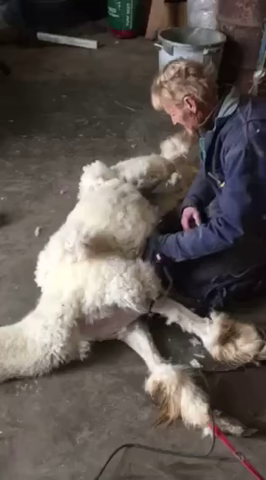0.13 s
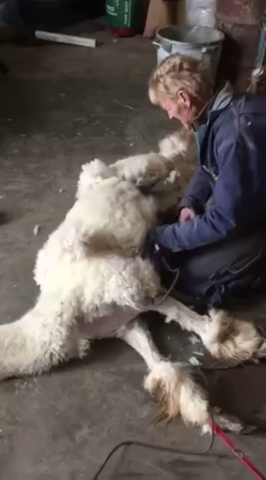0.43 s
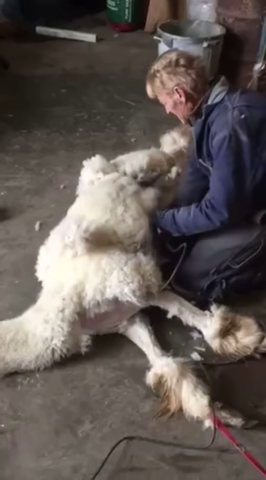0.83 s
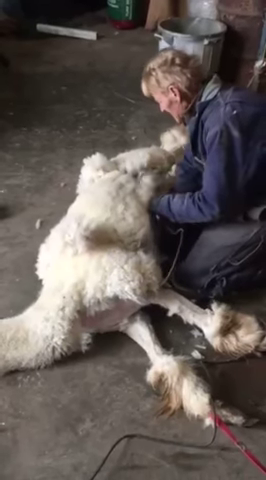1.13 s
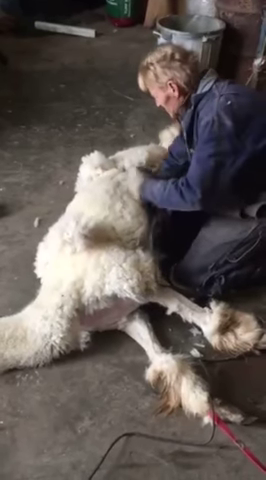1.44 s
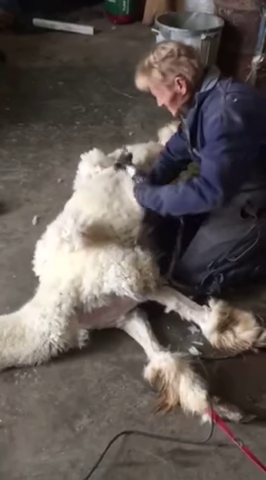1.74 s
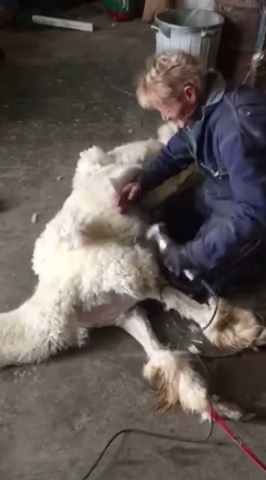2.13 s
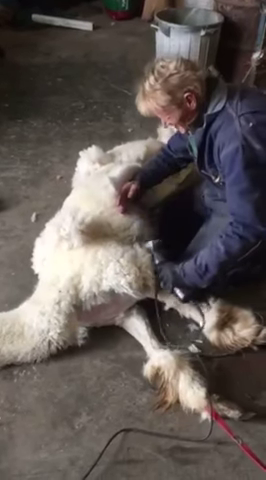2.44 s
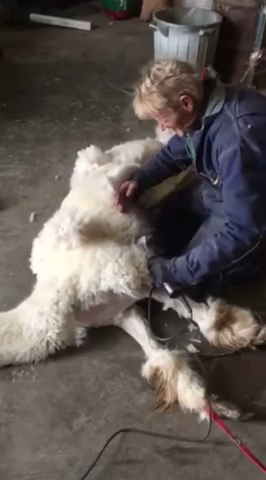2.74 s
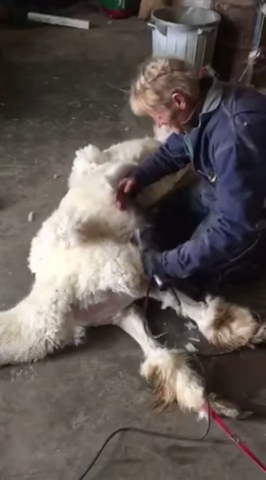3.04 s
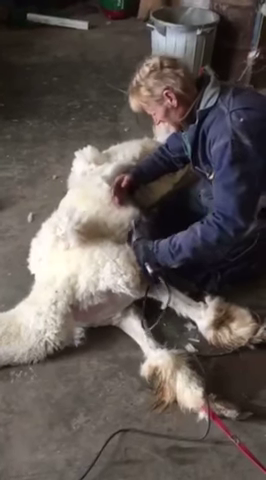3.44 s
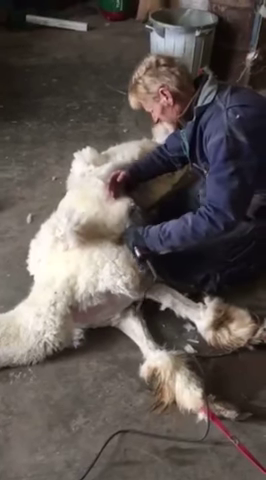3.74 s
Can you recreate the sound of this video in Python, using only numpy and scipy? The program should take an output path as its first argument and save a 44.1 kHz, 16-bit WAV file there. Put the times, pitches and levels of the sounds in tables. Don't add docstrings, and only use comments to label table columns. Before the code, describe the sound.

A continuous harsh buzz of motor clippers shearing fleece, starting abruptly; midway the tool lifts and turns thinner and hissier, then settles back to a stronger rattle. Indoor shed reflections, grainy phone sound.

```python
import sys
import numpy as np
from scipy import signal
from scipy.fft import rfft, irfft, dct
from scipy.io import wavfile
from scipy.ndimage import uniform_filter1d, map_coordinates

SR = 44100
rng = np.random.default_rng(int(sys.argv[2]) if len(sys.argv) > 2 else 0)


def decibels_to_gain(level_db):
    exponent = np.asarray(level_db, float) / 20
    return 10 ** exponent


def to_wav(sig):
    pcm = np.clip(np.atleast_2d(sig), -1, 1) * 32767
    pcm = np.round(pcm).astype(np.int16)
    wavfile.write(sys.argv[1], SR, pcm.T)


N = 171549

# time in seconds, whine in Hz (bars times turns per second).
WHINE_SPEED = [(.15, 7262), (.5, 7222), (.8, 7226), (1.1, 7256), (1.4, 7314), (1.7, 7359), (2, 7391),
               (2.3, 7406), (2.6, 7424), (2.9, 7432), (3.2, 7429), (3.5, 7417), (3.89, 7372)]
# time in seconds, blade level in dB, whine level in dB,
# extra treble from the open side of the head in dB.
HAND = [(.14, -33.5, -41.5, 7), (.26, -28.5, -38.5, -1.5), (.5, -29, -51, -1.5), (.7, -28.5, -42, -0.5),
        (1, -30.5, -58.5, -1.5), (1.28, -30.5, -38, 1), (1.4, -32, -50, 0), (1.68, -31.5, -45, 2.5),
        (1.8, -30.5, -40, 4), (1.95, -26.5, -35, 2), (2.1, -32, -40.5, 7.5), (2.36, -31.5, -42, 9),
        (2.5, -29.5, -43.5, 6.5), (2.66, -31.5, -38.5, 7), (2.71, -29, -41, 0), (3.2, -27.5, -40, -1),
        (3.6, -27.5, -41.5, -1.5), (3.88, -29, -52, -0.5)]
# time in seconds, pressed on the body (0-1), held high (0-1).
POSE = [
    (.14, 0.7, 0),
    (.7, 0.95, 0),
    (1.05, 0.5, 0.5),
    (1.3, 0, 0.5),
    (1.55, 0.01, 1),
    (2.1, 0.02, 1),
    (2.45, 0, .2),
    (3.88, 0.07, 0.5),
]
# multiple of crank speed, level in dB, gain when pressed in dB, gain when high in dB.
CRANK_TONES = [(1, -77, 9, 4), (2, -81, 16, 0), (3, -80, 18, 0), (4, -82, 8, 6), (5, -77, 15, 6),
               (6, -65, 6, -3), (7, -67, 10, -1), (8, -67, 6, 2), (9, -71, 2, 4), (10, -70, 0, 11),
               (11, -70, 6, 5), (12, -66, -4, 8), (14, -63, 0, -1), (16, -59, -3, -4)]
# multiple of motor speed, level in dB, gain when pressed in dB, gain when high in dB.
MOTOR_TONES = [(1, -54, -5, -10), (2, -49, -7, -4), (9, -57, 0, 0), (12, -63, 6, 0)]
# frequency in Hz, level in dB.
BLADE_COLOUR = [(250, -34.5), (620, -9), (1200, -1.5), (2000, -5), (3000, -3), (4300, -3.5), (4900, -7),
                (5800, -8)]
# frequency in Hz, level in dB.
RUMBLE_COLOUR = [(15, -29), (25, -12.5), (81, -13), (189, -12), (392, 0), (600, -8), (780, -36.5),
                 (1320, -120)]
# time in seconds, lag in ms, level in dB.
ECHO = [
    (.14, 0.71, -11.5),
    (1.62, 0.9, -15),
    (1.78, 0.82, -3.5),
    (2, 0.9, -5.5),
    (2.15, .78, -6),
    (2.38, 0.6, -6.5),
    (2.45, 0.78, -9.5),
    (2.7, 0.77, -9),
    (3.88, .74, -7.5),
]
# time in seconds, lag in ms, level in dB.
GLOVE = [
    (.14, .37, -9),
    (.7, 0.37, -11),
    (1.5, 0.37, -16),
    (1.95, 0.29, -10),
    (2.15, 0.35, -12.5),
    (2.35, 0.3, -6.5),
    (2.62, 0.29, -5.5),
    (2.75, 0.31, -12.5),
    (3.2, 0.29, -12),
    (3.88, 0.28, -15.5),
]
# frequency in Hz, level in dB.
MIC_COLOUR = [(4500, 0), (4950, -2), (5300, 0), (6000, 1), (6750, -2), (7200, 0)]
# frequency in Hz, step size in dB.
ROUNDING_STEP = [(500, -56), (900, -31), (1900, -22), (3500, -20.5), (5000, -20), (5600, -22.5),
                 (6800, -22), (8300, -24.5)]

BARS, CRANK_PER_TURN = 18, .12175
STROKE_TAIL, STROKE_JITTER = 0.3, 0.041
STROKE_SCATTER_DB, BACK_STROKE_DB = 3.5, -1.5
TICKS_PER_S, TICK_DB, TICK_LIMIT = 1500, -1, 4.5
RATTLE_FROM_HZ, SLIDE_DB = 1300, -0.5
OPEN_HZ, EDGE_HZ, EDGE_PER_OPEN_DB = 1858, 4200, 0.3263
ECHO_TOP_HZ, GLOVE_HZ = 2060, 3290
SHED_DB, SHED_T60_S, SHED_MISSES_OPEN = -3, 0.38, .7
RUMBLE_DB, RUMBLE_PRESSED_DB = -62, 12.5
START_S, PHONE_TOP = .1306, 0.39
ROLL_OFF_HZ, TOP_HZ, BASS_CUT_HZ, RESAMPLE_HZ = 7350, 7900, 42, 8150
STEP_SCATTER_DB, DEAD_ZONE, STEP_FOLLOWS = 2, .4, .45
QUICK_SHARE, QUICK_OPEN_SHARE, QUICK_STEP_DB, QUICK_TOP_HZ = .17, .9, -14, 7450


def unit(x):
    return x / np.sqrt(np.mean(x ** 2))


def column(table, k):
    a = np.array(table, float)
    return np.interp(np.arange(N) / SR, a[:, 0], a[:, k])


def on_log(table, hz):
    a = np.array(table, float)
    return np.interp(np.log(hz + 1), np.log(a[:, 0]), a[:, 1])


def butter(x, order, hz, kind="lowpass"):
    return signal.sosfilt(signal.butter(order, hz, kind, fs=SR, output="sos"), x)


def colour(x, table):
    size = 8192
    half = size // 2
    cepstrum = irfft(np.log(decibels_to_gain(on_log(table, np.arange(half + 1) * SR / size))))
    cepstrum[1:half] *= 2
    cepstrum[half + 1:] = 0
    response = irfft(np.exp(rfft(cepstrum)))[:half]
    return unit(signal.fftconvolve(x, response)[:N])


def walk(rate):
    k = int(SR / rate)
    steps = np.repeat(rng.standard_normal(N // k + 1), k)
    return unit(uniform_filter1d(uniform_filter1d(steps, k), k)[:N])


def delayed(x, lag_ms):
    return map_coordinates(x, [np.arange(N) - lag_ms * SR / 1000], mode="mirror")


def blades(crank):
    stroke = 2 * crank + STROKE_JITTER * walk(40)
    count = N // 100
    size_db = STROKE_SCATTER_DB * np.tanh(rng.standard_normal(count))
    size = decibels_to_gain(size_db + BACK_STROKE_DB * (np.arange(count) % 2))
    burst = size[stroke.astype(int).clip(0)] * np.exp(-(stroke % 1) / STROKE_TAIL)
    dice = rng.random((3, N))
    ticks = (dice[0] < TICKS_PER_S / SR) * np.sign(dice[1] - .5) * decibels_to_gain(-TICK_DB * np.log(dice[2] + .1))
    rattle = unit(burst * (unit(ticks) + rng.standard_normal(N)))
    rattle = TICK_LIMIT * np.tanh(rattle / TICK_LIMIT)
    rattle = butter(rattle, 1, RATTLE_FROM_HZ, "highpass")
    slide = decibels_to_gain(SLIDE_DB) * rng.standard_normal(N)
    return colour(rattle + slide, BLADE_COLOUR)


def turn_head(steel):
    open_db = column(HAND, 3)
    bright = butter(steel, 2, OPEN_HZ, "highpass")
    dull = butter(steel, 2, OPEN_HZ)
    edge = butter(bright, 2, EDGE_HZ, "highpass")
    bright = bright + (decibels_to_gain(EDGE_PER_OPEN_DB * open_db) - 1) * edge
    return (dull - decibels_to_gain(open_db) * bright) * decibels_to_gain(column(HAND, 1) - 1.5 + 0.43 * walk(5.925))


def floor_echo(steel):
    soft = butter(steel, 1, ECHO_TOP_HZ)
    return decibels_to_gain(column(ECHO, 2)) * delayed(soft, column(ECHO, 1) - .05)


def glove_echo(steel):
    cupped = butter(steel, 1, [GLOVE_HZ * .7, GLOVE_HZ * 1.2], "bandpass")
    return decibels_to_gain(column(GLOVE, 2)) * delayed(cupped, column(GLOVE, 1))


def shed(steel):
    size = SR // 2
    out = 0
    for _ in range(4):
        tail = rng.standard_normal(size) * decibels_to_gain(-60 * np.arange(size) / SR / SHED_T60_S)
        fed = np.r_[steel[size:0:-1], steel * walk(7)]
        out = out + signal.fftconvolve(fed, tail / np.sqrt(4 * np.sum(tail ** 2)))[size:size + N]
    return out


def motor_whine(turns):
    level = decibels_to_gain(column(HAND, 2) + 1.5 + 1.8 * walk(12))
    return np.sqrt(2) * level * np.sin(2 * np.pi * BARS * turns + 0.3 * walk(76))


def hum(table, turns, wander_db):
    pressed, high = np.clip(column(POSE, 1), 0, 1), np.clip(column(POSE, 2), 0, 1)
    out = 0
    for multiple, db, pressed_db, high_db in table:
        level = decibels_to_gain(db + pressed_db * pressed + high_db * high + wander_db * walk(10))
        cycles = round(multiple) * turns + rng.random() + 0.3 * walk(13)
        out = out + np.sqrt(2) * level * np.sin(2 * np.pi * cycles)
    return out


def body_rumble():
    rumble = colour(rng.standard_normal(N), RUMBLE_COLOUR + [(1200, -41.5)])
    return rumble * decibels_to_gain(RUMBLE_DB + RUMBLE_PRESSED_DB * column(POSE, 1) + 2.9 * walk(18))


def scene():
    turns = np.cumsum(column(WHINE_SPEED, 1)) / BARS / SR
    crank = turns * CRANK_PER_TURN
    steel = turn_head(blades(crank + .3))
    to_shed = steel * decibels_to_gain(-SHED_MISSES_OPEN * column(HAND, 3))
    rattle = steel + floor_echo(steel) + glove_echo(steel) + decibels_to_gain(SHED_DB) * shed(to_shed)
    tones = hum(CRANK_TONES, crank, wander_db=3.0) + hum(MOTOR_TONES, turns, wander_db=-0.5)
    return (rattle + motor_whine(turns) + tones + body_rumble())[None]


def thrifty_phone(x, size=1024, count=8):
    h = size // 2
    hz = np.arange(size) * SR / 2 / size
    win = np.sin(np.pi * (np.arange(2 * size) + .5) / (2 * size))
    pad = np.r_[np.zeros(size), x, np.zeros(2 * size)]
    slices = np.array([pad[i:i + 2 * size] * win for i in range(0, N + size, size)])
    a, b, c, d = slices.reshape(-1, 4, h).transpose(1, 0, 2)
    lines = dct(np.c_[-c[:, ::-1] - d, a - b[:, ::-1]], 4, norm="ortho")
    scatter = np.repeat(rng.standard_normal((len(lines), size // count)), count, axis=1)
    level = np.sqrt(np.mean(lines ** 2, axis=1, keepdims=True)) + 1e-9
    step = decibels_to_gain(on_log(ROUNDING_STEP, hz) + STEP_SCATTER_DB * scatter)
    step = (level / level.mean()) ** STEP_FOLLOWS * step
    bare = column(HAND, 3)[np.minimum(np.arange(len(lines)) * size, N - 1)] > 4
    quick = (rng.random(len(lines)) < np.where(bare, QUICK_OPEN_SHARE, QUICK_SHARE))[:, None]
    step = step * decibels_to_gain(QUICK_STEP_DB * quick * (hz < QUICK_TOP_HZ))
    rounded = np.sign(lines) * np.floor(np.abs(lines) / step + DEAD_ZONE) * step
    u = dct(rounded, 4, norm="ortho")
    p, q = u[:, :h], u[:, h:]
    frames = np.c_[q, -q[:, ::-1], -p[:, ::-1], -p] * win
    first, second = frames[:, :size].ravel(), frames[:, size:].ravel()
    out = np.r_[first, np.zeros(size)] + np.r_[np.zeros(size), second]
    return out[size:size + N]


def top_cut(x):
    return signal.sosfilt(signal.butter(12, 8750, fs=SR, output="sos"), x)


def record(dry):
    x = colour(dry[0], MIC_COLOUR) * np.std(dry)
    x = PHONE_TOP * np.tanh(x / PHONE_TOP)
    x = butter(x, 9, ROLL_OFF_HZ)
    x = signal.sosfilt(signal.ellip(8, .3, 80, TOP_HZ, fs=SR, output="sos"), x)
    x = butter(x, 2, BASS_CUT_HZ, "highpass")
    x = thrifty_phone(x)
    x = signal.sosfilt(signal.ellip(10, .3, 70, RESAMPLE_HZ, fs=SR, output="sos"), x)
    fade_in = np.clip((np.arange(N) - START_S * SR) / 6, 0, 1)
    fade_out = np.clip((N - np.arange(N)) / 60, .15, 1)
    x = x * fade_in * fade_out
    return top_cut(x[None])


dry = scene()
out = record(dry)
to_wav(out)
```